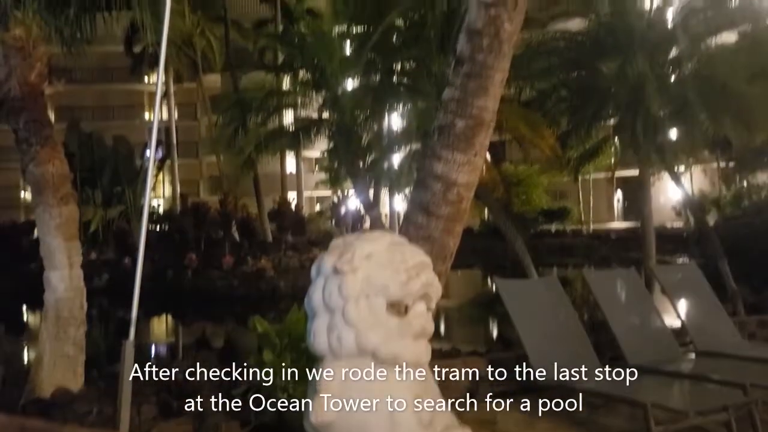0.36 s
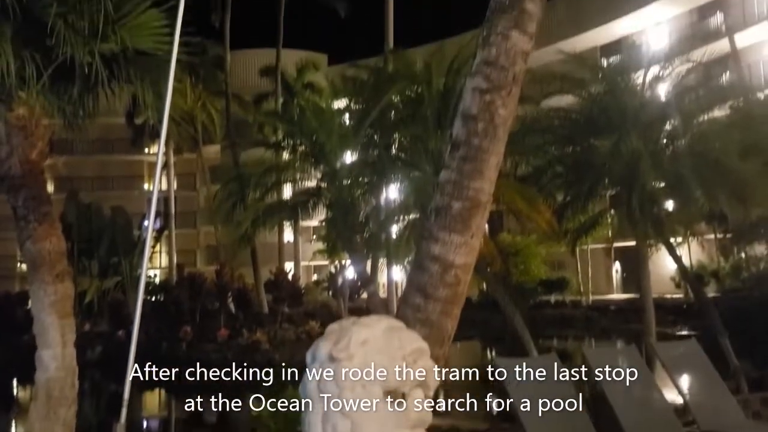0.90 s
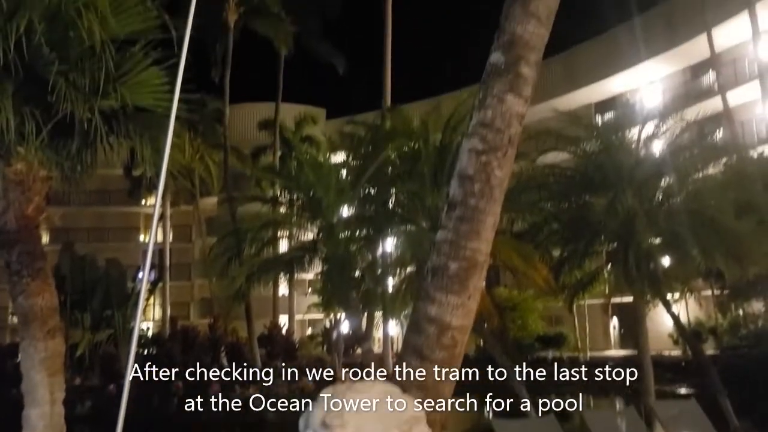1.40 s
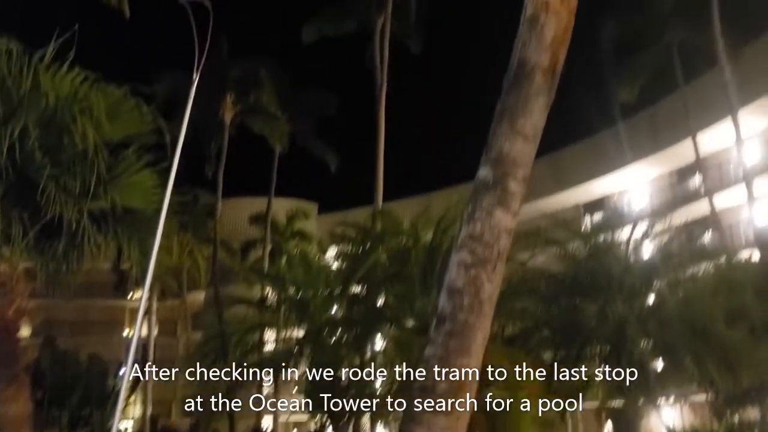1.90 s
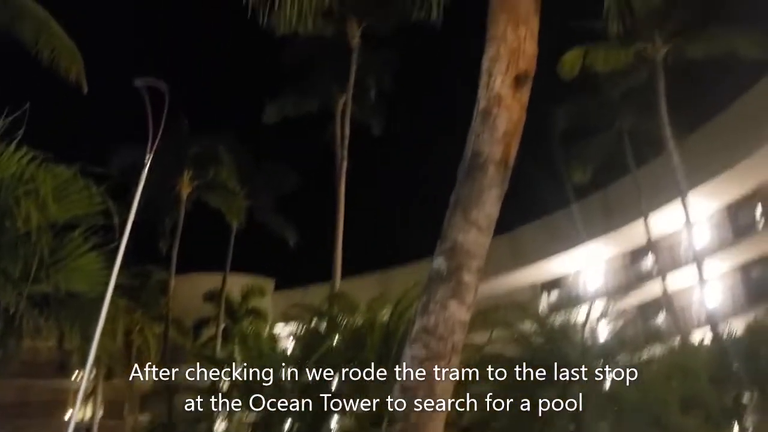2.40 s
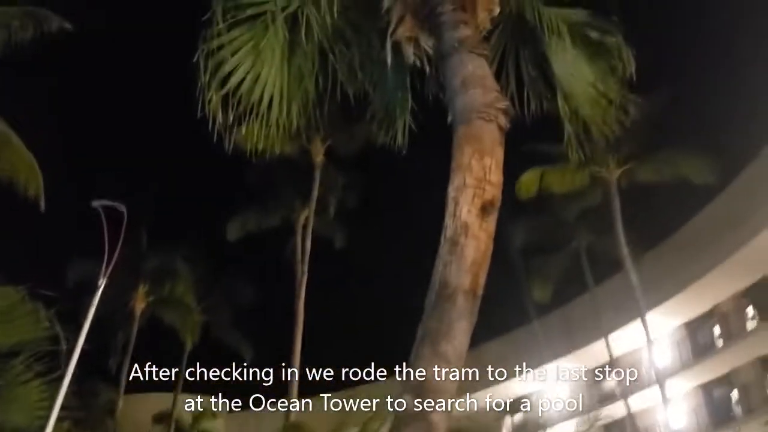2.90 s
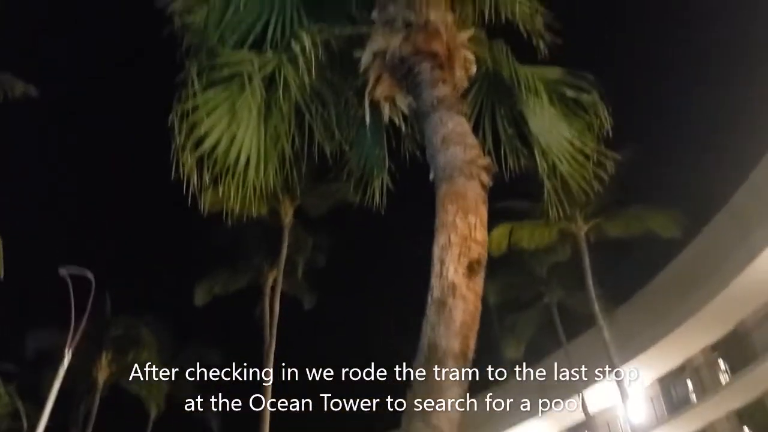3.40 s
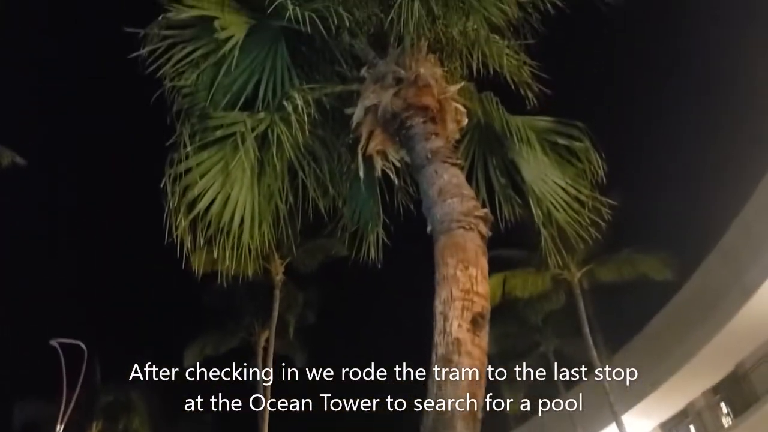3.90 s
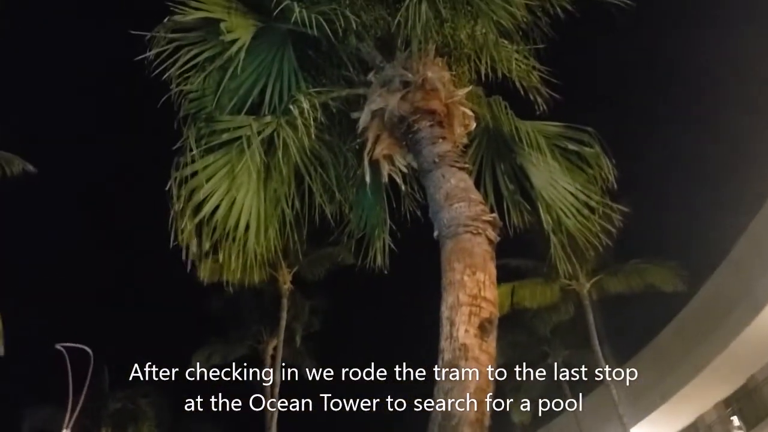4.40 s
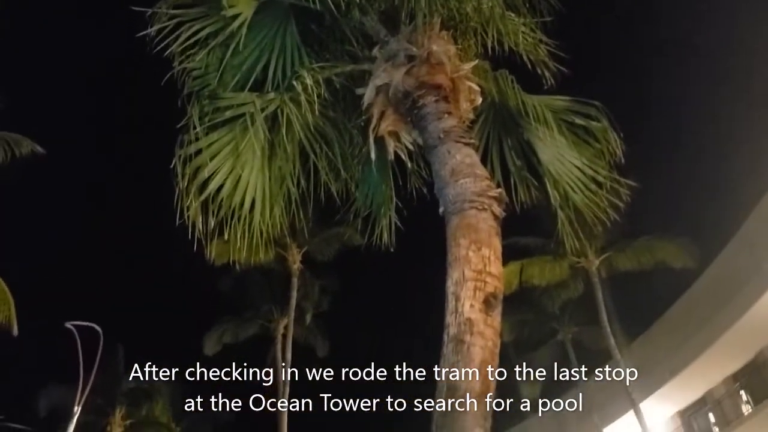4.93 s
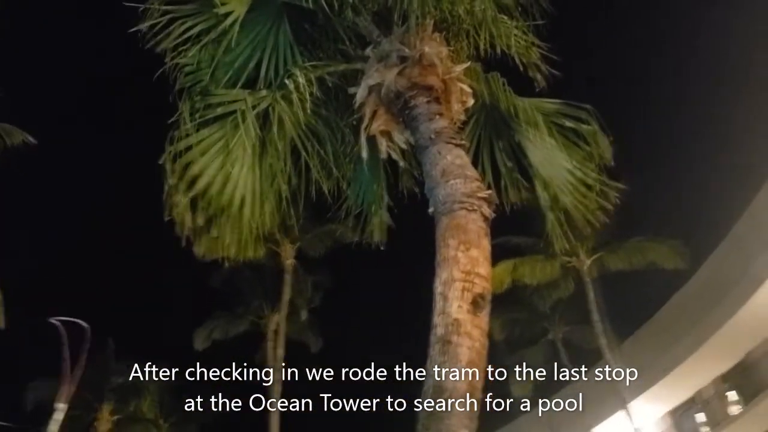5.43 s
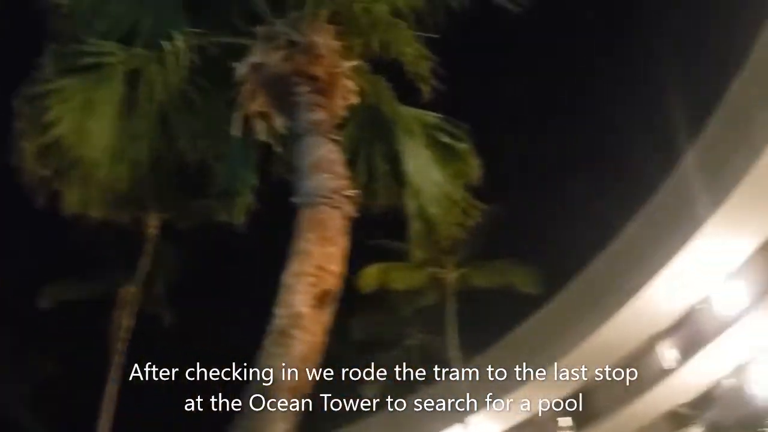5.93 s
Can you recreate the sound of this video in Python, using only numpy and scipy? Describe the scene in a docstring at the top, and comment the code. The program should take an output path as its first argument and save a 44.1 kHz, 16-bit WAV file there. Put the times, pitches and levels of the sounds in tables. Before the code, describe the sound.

Quiet nighttime hum and rustling with crackling snaps, then roosting birds call sparsely before bursting into loud, hoarse, echoing chatter.

```python
"""Birds roost in palm crowns at night: squeaks and whistles are bending syrinx tones, and the flock behind them
is hundreds of short hoarse calls that swell late on. Breathy bursts of throbbing noise surround the calls; grainy
hiss over a duller body is rustle early and the chorus's harsh treble late; snaps, cracks, thuds and knocks are
decaying noise. A ring of buildings smears the calls in a diffuse tail, and building machinery drones below as
shaped noise with narrow hums. It is heard on a phone with two unlike microphone ports."""
import sys
import numpy as np
from scipy import signal
from scipy.fft import rfft, irfft, next_fast_len
from scipy.io import wavfile
from scipy.ndimage import uniform_filter1d

SR = 44100
rng = np.random.default_rng(int(sys.argv[2]) if len(sys.argv) > 2 else 0)


def voltage_ratio(decibels):
    """Convert decibels (scalar or array-like) to amplitude ratios, 20 dB per decade."""
    exponent = np.asarray(decibels, float) / 20
    return 10 ** exponent


def file_out(sig):
    """Save sig as 16-bit WAV at sys.argv[1]."""
    # one column per channel
    cols = np.atleast_2d(sig).T
    # limit, then scale
    lim = np.clip(cols, -1, 1)
    pcm = np.round(lim * 32767).astype(np.int16)
    wavfile.write(sys.argv[1], SR, pcm)


N = 266805
t = np.arange(N) / SR
PORT_LAG = 24  # samples by which a sound fully to one side reaches the far port late
SHADOW_DB = 5  # the phone's body: such a sound is this much up at the near port, down at the far one


def curve(table, column):
    """One level column of a table over time, as gain."""
    rows = np.array(table)
    return voltage_ratio(np.interp(t, rows[:, 0], rows[:, column]))


def shape(x, hz, db):
    """Filter by dB points on a log-frequency axis."""
    length = x.shape[-1]
    size = next_fast_len(length + 4096)
    f = np.fft.rfftfreq(size, 1 / SR) + 1
    gain = voltage_ratio(np.interp(np.log(f), np.log(hz), db))
    return irfft(rfft(x, size) * gain, size)[..., :length]


def unit(x):
    """Scale to rms 1."""
    return x / np.sqrt(np.mean(x ** 2))


def noise(colour):
    """Two unrelated noises of one colour."""
    return unit(shape(rng.standard_normal((2, N)), *np.transpose(colour)))


def walk(rate):
    """Random levels held 1 / rate s and smoothed twice; spread near 1."""
    hold = int(SR / rate)
    steps = np.repeat(rng.standard_normal(N // hold + 1), hold)
    return 1.4 * uniform_filter1d(uniform_filter1d(steps, hold), hold)[:N]


def add(out, sound, s, side):
    """Place a sound (one row, or one per port); side -1 reaches the left port first and louder, +1 the right."""
    for channel, (away, row) in enumerate(zip((side, -side), sound * np.ones((2, 1)))):
        i = max(int(s * SR + (1 + away) * PORT_LAG / 2), 0)
        out[channel, i:i + len(row)] += voltage_ratio(-SHADOW_DB * away) * row[:max(N - i, 0)]


# level of the low drone, lower for the first second, before the trim in drone(): (t/s, level/dB)
DRONE_LEVEL = [(0.0, -46), (1.1, -47), (1.5, -41.5), (2.5, -42), (4.6, -40), (6.05, -42.5)]
# rumble spectrum, relative: (f/Hz, level/dB per Hz)
DRONE_COLOUR = [(12, -58), (20, -74), (46, -7.5), (75, -1), (156, -10), (180, -17), (229, -12), (352, -19),
                (387, -20), (440, -25.5), (476, -23.5), (687, -30), (900, -41), (1170, -48), (1980, -120)]
# machine hums: (f/Hz, bandwidth/Hz, level/dB against the rumble)
DRONE_HUMS = [(79.36, 1.75, -4.5), (119, 0.94, -3.5), (153.4, 9.3, -6.5)]


def drone():
    """Machinery far off: broad rumble with narrow noise-driven hums, nearly alike at both ports."""
    mid, side = noise(DRONE_COLOUR + [(2500, -68.0), (16000, -78)])
    for hz, width, hum_db in DRONE_HUMS:
        ring = signal.lfilter(*signal.iirpeak(hz, hz / width, SR), rng.standard_normal(N))
        mid = mid + voltage_ratio(hum_db) * unit(ring)
    side = shape(side, [60, 150, 300, 600], [-16.0, -7.5, -9.0, 0.5])
    stereo = mid + side * np.array([[1], [-1]])
    waver = voltage_ratio(0.6 * walk(3.5))
    return voltage_ratio(-2.5) * curve(DRONE_LEVEL, 1) * waver * stereo


# wall echoes, before the yard's overall gain: (delay t/s, level/dB against the diffuse tail)
WALL_ECHOES = [(0.057, -15), (0.149, -14), (0.184, -18), (0.302, -20)]


def yard(x):
    """Curved house fronts: a few clumped echoes in a long diffuse tail, other paths to each port."""
    t60_s, yard_db = 0.66, 2
    time = t[:int(1.6 * SR)]
    tail = np.exp(-np.log(1000) * time / t60_s) * np.clip(time / 0.0068, 0, 1)
    tail = tail / np.sqrt(np.sum(tail ** 2))
    for delay, echo_db in WALL_ECHOES:
        clump = np.exp(-.5 * ((time - delay) / 0.0017) ** 2)
        tail = tail + voltage_ratio(echo_db) * clump / np.sqrt(np.sum(clump ** 2))
    response = shape(rng.standard_normal((2, len(time))), [1000, 6000, 16000], [0, -1, -5]) * tail
    mono = x.mean(axis=0, keepdims=True)
    return voltage_ratio(yard_db) * signal.fftconvolve(mono, response, axes=1)[:, :N]


# rustle early, harsh treble of the bird chorus late, before the trims in grainy_hiss():
# (t/s, hiss level/dB, duller body level/dB)
HISS_LEVELS = [(0.0, -65.5, -59.5), (1.31, -72, -59.5), (1.6, -65, -48), (1.82, -52, -48),
               (2.12, -73, -38.5), (2.3, -65, -42.5), (2.46, -49.5, -41), (2.57, -45.5, -38.5),
               (2.94, -49, -43.5), (3.04, -55, -48.5), (3.3, -55, -50.5), (4.27, -45.5, -52.5),
               (4.41, -40.5, -52.5), (4.8, -38, -40.5), (4.97, -34.5, -50.5), (5.34, -31, -42.5),
               (5.8, -35.5, -44.5), (6.05, -35, -51)]
# hiss balance: (t/s, left minus right level/dB)
HISS_PAN = [(0.0, -3), (1.3, -3), (2.5, -0.5), (3.8, -2.5), (4.5, -2.5), (6.05, -6)]
# hiss spectrum, relative: (f/Hz, level/dB per Hz)
HISS_COLOUR = [(1200, -17.5), (2500, 7.5), (5000, 4), (10000, -4.5), (16000, -7.5)]
# duller body spectrum, relative: (f/Hz, level/dB per Hz)
BODY_COLOUR = [(250, 0), (500, -6.5), (1200, -7), (2500, -8), (5000, -6.5)]


def grainy_hiss():
    """Hiss made grainy by dense tiny ticks, over a duller body: rustle early, the chorus's harsh treble late."""
    ticks_db = 2.0 * rng.exponential(size=N) * (rng.random(N) < .004)
    grain = voltage_ratio(ticks_db + 1.3 * walk(20))
    hiss, body = noise(HISS_COLOUR), noise(BODY_COLOUR)
    # the right port shares some of the left port's sound, a little later
    hiss[1] = 0.2 * np.roll(hiss[0], PORT_LAG) + 0.91 * hiss[1]
    body[1] = 0.44 * np.roll(body[0], PORT_LAG) + 0.9 * body[1]
    pan = np.sqrt(curve(HISS_PAN, 1))
    hiss = unit(hiss * uniform_filter1d(grain, size=40)) * [pan, 1 / pan]
    body = body * voltage_ratio(0.38 * walk(6.37))
    return voltage_ratio(9.5) * curve(HISS_LEVELS, 1) * hiss + voltage_ratio(2.5) * curve(HISS_LEVELS, 2) * body


# snaps and cracks, with a few low thuds and knocks, before filter and port placing:
# (t/s, crack level/dB, swish level/dB, centre f/Hz)
SNAPS_AND_KNOCKS = [(.15, -44, -53, 9050), (0.191, -40, -53, 9000), (0.431, -60, -43, 4100),
                    (0.471, -49, -53, 2450), (0.819, -44, -52.5, 3640), (1.3, -33, -44.5, 6040),
                    (1.369, -43, -51.5, 1640), (1.505, -51, -40.5, 2500), (1.546, -31, -53, 1100),
                    (1.662, -32, -43, 6000), (1.749, -34, -48, 9000), (1.823, -23, -29, 6600),
                    (2.0, -33, -47, 1200), (2.043, -46, -41, 6000), (2.115, -11.5, -29, 8700),
                    (2.141, -26, -28.5, 450), (2.391, -28, -40.5, 1550), (2.72, -18, -30.5, 3950),
                    (2.789, -26, -45, 1400), (2.849, -42, -29, 477), (2.885, -36, -36, 520),
                    (2.94, -40, -36, 560), (2.857, -25, -34.5, 3160), (2.952, -29, -54, 1300)]


def snaps_and_knocks():
    """Noise decaying within a few milliseconds, each with a longer swish, on the left; the low ones thud and knock."""
    out = np.zeros((2, N))
    time = t[:8000]
    for s, db, swish_db, hz in SNAPS_AND_KNOCKS:
        fall = voltage_ratio(db) * np.exp(-time / .0022) + voltage_ratio(swish_db) * np.exp(-time / .06)
        fall = fall * np.clip(time / 0.0002, 0, 1)
        burst = rng.standard_normal(len(time)) * fall
        add(out, shape(burst, [hz / 5.0, hz, hz * 3.2], [-18, 0, -16]), s, -1)
    return out


# breathy treble bursts around the calls: (t/s, length/s, level/dB before the throb)
BREATH_BURSTS = [(2.355, 0.079, -39.5), (2.483, 0.058, -38), (3.205, 0.095, -42.5), (3.343, 0.083, -38),
                 (3.666, 0.022, -37.5), (3.707, 0.025, -34.5), (3.845, 0.083, -36.5), (4.238, 0.039, -37),
                 (4.38, 0.048, -53), (4.934, 0.088, -30), (5.095, 0.043, -27), (5.207, 0.079, -31),
                 (5.41, 0.077, -24.5), (5.815, 0.035, -34), (5.96, .08, -36)]


def breaths():
    """Short throbbing bursts of breathy treble noise around the birds' calls, each dying away."""
    throb_hz, depth, tail_s = 21.2, 0.32, 0.02
    gate = np.zeros(N)
    for s, length, db in BREATH_BURSTS:
        since = t - s
        throb = 1 + depth * np.cos(2 * np.pi * throb_hz * since)
        onset = np.clip(since / 0.0037, 0, 1)
        decay = np.exp(-np.clip(since - length, 0, None) / tail_s)
        gate = gate + voltage_ratio(db) * throb * onset * decay
    return gate * noise([(2000, -16.0), (5000, 6), (10000, 0.5), (16000, -9.5)])


def leaves(x, scatter_db):
    """Fronds around each perch scatter a call over a few milliseconds, differently for each port."""
    time = t[:900]
    sparse = rng.random((2, len(time))) < .05
    scatter = rng.standard_normal((2, len(time))) * np.exp(-time / .007) * sparse
    scatter = voltage_ratio(scatter_db) * scatter / np.sqrt(np.sum(scatter ** 2, axis=1, keepdims=True))
    scatter[:, 0] = 1  # the direct call
    return signal.fftconvolve(x[None], scatter, axes=1)


# syrinx partials 2 upward: (level/dB against the call's brightness)
OVERTONES_DB = [3, -2, -15]


def sing(rows, rough, throb_hz, hoarse, bright_db):
    """A syrinx tone along (t/s, f/Hz, level/dB) points: weak overtones, fast uneven throb, hoarsely shaking pitch."""
    s, hz, db = np.transpose(rows)
    time = np.arange(s[0], max(s[-1], s[0] + .004), 1 / SR)
    shake = np.interp(time - s[0], np.arange(200) / 500, rng.standard_normal(200))
    pitch = uniform_filter1d(np.interp(time, s, hz), size=130) * (1 + hoarse * shake)
    phase = 2 * np.pi * np.cumsum(pitch) / SR
    wave = np.sin(phase)
    for k, over_db in enumerate(OVERTONES_DB, 2):
        below_limit = k * pitch < SR * .45
        wave = wave + voltage_ratio(bright_db + over_db) * np.sin(k * phase) * below_limit
    beat = 2 * np.pi * throb_hz * (time - s[0])
    throb = 1 + rough * np.sin(beat + 2.7 * np.sin(0.299 * beat))
    envelope = voltage_ratio(np.interp(time, s, db)) * signal.windows.tukey(len(time), .25)
    return np.sqrt(2) * wave * throb * envelope


def chatter(count, pitch, octaves, bend, hoarse, side):
    """Many short hoarse calls around one side and one (t/s, f/Hz) pitch: rising, falling or arched, each its own size."""
    out = np.zeros((2, N))
    for k, draws in enumerate(rng.random((count, 8))):
        when, size, up, start_bend, end_bend, soft, speed, down = draws
        s = (k + when) / count * N / SR
        length = 0.00996 + 0.02504 * size ** 2
        top = np.interp(s, *np.transpose(pitch)) * 2 ** (octaves * (up - down))
        rows = [(0, top * (1 - bend * start_bend), -6),
                (length / 2, top, 0),
                (length, top * (1 - bend * end_bend), -5)]
        call = sing(rows, 0.8, 90 + 140 * speed, hoarse, bright_db=-20.5)
        # faster-throbbing calls sit further right
        add(out, voltage_ratio(-7 * soft) * leaves(call, scatter_db=-2.5), s, side + 0.54 * (speed - .5))
    return unit(out)


# the rest of the roost, before the trims in flock(): (t/s, low chatter level/dB, high squeaks level/dB)
FLOCK_LEVELS = [(0.0, -71, -63.5), (1.31, -93, -60), (1.8, -55, -52.5), (2.27, -43.5, -47),
                (2.45, -38, -33.5), (2.76, -50, -44), (2.96, -96, -59), (3.25, -44, -44),
                (3.39, -34.5, -36.5), (3.5, -58, -45.5), (3.75, -39.5, -38.5), (4.24, -44, -39.5),
                (4.41, -25, -31.5), (4.55, -34, -31.5), (4.9, -23, -39), (5.4, -25, -36.5),
                (5.75, -26.5, -34), (6.05, -27.5, -30.5)]
# centre pitch of the low chatter: (t/s, f/Hz)
FLOCK_PITCH = [(0.0, 3445), (2.4, 3670), (3.0, 3520), (3.3, 3768), (4.0, 4017), (4.3, 3442), (4.7, 3348),
               (4.9, 3590), (5.15, 3792), (5.4, 3307), (5.7, 3384), (6.05, 3390)]


def flock():
    """Crowds of syrinx calls: low chatter on the right and high squeaks on the left, each riding its own level."""
    low = chatter(count=900, pitch=FLOCK_PITCH, octaves=.65, bend=0.16, hoarse=0.015, side=.7)
    high = chatter(count=500, pitch=[(0, 6000)], octaves=.26, bend=.3, hoarse=0.0474, side=-.7)
    return voltage_ratio(-2.5) * curve(FLOCK_LEVELS, 1) * low + voltage_ratio(-5.0) * curve(FLOCK_LEVELS, 2) * high


def arch(s, length, start_hz, top_hz, end_hz, db):
    """A squeak: pitch glides to a thinner, rounded top and on along a weaker flank."""
    rise, fall = 0.28, 0.33  # shares of the call spent reaching the top and leaving it
    start_db, top_db, end_db = 1, -5.5, -7  # against the middle of the first flank
    share = np.array([0, rise / 2, rise, 1 - fall, 1 - fall / 2, 1])
    climb_hz, drop_hz = top_hz - (top_hz - start_hz) / 4, top_hz - (top_hz - end_hz) / 4
    hz = [start_hz, climb_hz, top_hz, top_hz, drop_hz, end_hz]
    level = db + np.array([start_db, 0, top_db, top_db, end_db, end_db])
    return np.transpose([s + length * share, hz, level])


# arched squeaks, before port placing: (t/s, length/s, start f/Hz, top f/Hz, end f/Hz, level/dB)
SQUEAK_CALLS = [(2.333, 0.05, 5800, 6660, 3050, -41.5), (3.207, 0.041, 3800, 6710, 3520, -35),
                (3.664, 0.052, 4190, 6670, 2950, -33.5), (3.848, 0.056, 5860, 6200, 3280, -38.5),
                (4.231, 0.045, 5000, 6600, 6500, -37), (4.734, 0.028, 5000, 6560, 6600, -33.5),
                (3.346, 0.035, 5700, 6220, 6050, -43), (4.997, 0.052, 5630, 6080, 5800, -33.5),
                (5.409, 0.051, 5760, 5800, 5600, -35.5)]


def squeaking_bird():
    """A bird up to the left: hoarse, rough syrinx arches, strongly scattered by its leaves."""
    out = np.zeros((2, N))
    for call in SQUEAK_CALLS:
        song = sing(arch(*call), .65, 240., hoarse=.018, bright_db=-24)
        add(out, leaves(song, scatter_db=0), call[0], -1)
    return out


def glide(s, length, start_hz, middle_hz, end_hz, db):
    """A whistle or tonal knock: pitch bends through its middle, level swells and fades."""
    return [(s, start_hz, db - 2), (s + length / 2, middle_hz, db), (s + length, end_hz, db - 3)]


# whistled notes, and a few very short tonal knocks, before port placing:
# (t/s, length/s, start f/Hz, middle f/Hz, end f/Hz, level/dB)
WHISTLES_AND_KNOCKS = [(0.064, 0.069, 2470, 2420, 2290, -65), (0.244, 0.031, 3460, 3450, 3510, -61),
                       (0.353, 0.21, 2600, 2610, 2620, -72), (0.584, 0.063, 1660, 1750, 1730, -71),
                       (1.01, 0.014, 5450, 5570, 5500, -63), (1.728, 0.013, 4020, 3940, 3950, -49),
                       (1.511, 0.0074, 1750, 1720, 1700, -54), (1.808, 0.0099, 3600, 3600, 3550, -45),
                       (2.488, 0.105, 3220, 3230, 3240, -39.5), (2.625, 0.085, 3030, 3020, 3000, -42),
                       (2.366, 0.015, 4240, 3830, 3200, -43.5), (2.422, .014, 4000, 3850, 3800, -42),
                       (2.718, .014, 4000, 3800, 3500, -40), (2.714, 0.036, 3200, 3130, 3000, -44),
                       (2.744, 0.046, 3220, 3180, 3170, -42), (2.785, 0.12, 3080, 3070, 2970, -48),
                       (2.896, .05, 3040, 3050, 3070, -48), (3.274, .022, 2800, 2750, 2600, -48),
                       (3.296, 0.023, 3700, 3700, 3640, -53), (3.347, 0.15, 3100, 3080, 3060, -47),
                       (3.212, 0.044, 5100, 5160, 5050, -53), (3.48, 0.185, 3080, 3090, 3060, -47),
                       (3.416, 0.016, 2050, 2020, 2000, -49), (4.385, 0.018, 2000, 1950, 1940, -40),
                       (4.501, 0.0397, 5700, 5500, 5400, -32), (4.555, 0.027, 5780, 5750, 5740, -31),
                       (3.712, 0.014, 3650, 3750, 3720, -36.5), (3.763, 0.032, 2620, 2680, 2520, -41.5),
                       (3.838, 0.042, 2980, 3090, 3000, -40), (3.891, 0.088, 3080, 3040, 2990, -45.5),
                       (3.902, 0.051, 3980, 4050, 3940, -42), (4.006, 0.064, 3050, 3000, 3050, -50),
                       (4.135, 0.028, 2974, 2940, 3030, -36.5), (4.199, 0.054, 3000, 2990, 2950, -43),
                       (4.36, 0.078, 3150, 3120, 3096, -45), (4.438, 0.055, 3050, 2990, 2920, -33),
                       (4.498, 0.051, 3000, 2996, 2900, -30.5), (4.357, 0.065, 3300, 3337, 3300, -36),
                       (4.566, 0.065, 3750, 3620, 3700, -34), (4.628, 0.059, 3050, 2990, 3000, -40),
                       (4.66, 0.056, 3780, 3760, 3740, -44), (4.723, 0.045, 2980, 3030, 2910, -41),
                       (4.792, 0.02, 3340, 3330, 3400, -18), (4.818, 0.016, 3150, 3120, 3150, -22),
                       (4.902, 0.017, 4100, 4170, 4350, -25), (4.813, 0.016, 4800, 4560, 3840, -25.5),
                       (4.825, 0.023, 4300, 4670, 4560, -24.5), (4.846, 0.044, 2500, 2820, 3040, -27.5),
                       (4.845, 0.045, 2400, 2140, 2140, -33), (4.886, 0.04, 2140, 2134, 2150, -24),
                       (4.883, 0.025, 4100, 4170, 4300, -26), (4.956, 0.012, 4400, 4300, 4300, -21),
                       (4.968, 0.046, 2830, 2880, 2950, -30), (4.96, .03, 6200, 5900, 5640, -25),
                       (5.003, .02, 5850, 5950, 5960, -31), (5.021, 0.028, 2750, 2236, 1860, -25.5),
                       (5.047, 0.021, 3700, 3860, 3930, -18.5), (5.127, 0.037, 2620, 2634, 2660, -31),
                       (5.069, 0.01, 3800, 4070, 4160, -14), (5.077, 0.0116, 4300, 4640, 4750, -19),
                       (5.083, 0.021, 5250, 5280, 5150, -24), (5.096, 0.027, 3600, 4050, 4550, -22),
                       (5.197, 0.012, 4500, 4500, 4400, -22), (5.215, 0.035, 4250, 4200, 4200, -28),
                       (5.271, 0.04, 3600, 3990, 3860, -21), (5.404, 0.054, 5450, 5350, 5400, -30.5),
                       (5.43, .02, 3450, 3450, 3400, -26), (5.306, 0.081, 2780, 2282, 2134, -22),
                       (5.385, 0.041, 2220, 2200, 2190, -32), (5.3, 0.026, 3100, 2985, 2780, -19),
                       (5.328, 0.037, 2800, 2984, 3080, -19), (5.347, 0.047, 3220, 3160, 3130, -24.5),
                       (5.44, 0.018, 2950, 3020, 3080, -25), (5.249, 0.055, 2950, 2970, 2850, -24),
                       (5.39, 0.047, 3050, 3113, 3170, -27), (5.451, 0.053, 2880, 2873, 2880, -25.5),
                       (5.493, 0.02, 4000, 4460, 4700, -19), (5.498, 0.038, 4780, 4836, 5000, -18.5),
                       (5.535, 0.026, 4810, 4850, 4930, -22.5), (5.494, 0.078, 2300, 2340, 2320, -33),
                       (5.63, 0.067, 2850, 2780, 2880, -36), (5.69, 0.043, 4200, 4150, 4300, -32),
                       (5.663, 0.039, 2340, 2330, 2360, -33), (5.703, 0.025, 2560, 2530, 2580, -21.5),
                       (5.729, 0.072, 2692, 2755, 2730, -20.5), (5.788, 0.016, 2500, 2315, 2020, -21.5),
                       (5.801, 0.014, 3300, 3350, 3280, -21), (5.811, 0.018, 3950, 4070, 4200, -21),
                       (5.843, .014, 4100, 4000, 3900, -25), (5.858, .016, 3300, 3090, 2950, -24.5),
                       (5.867, 0.02, 2500, 2210, 1940, -25), (5.944, 0.018, 3350, 3380, 3320, -23.5),
                       (6.024, 0.027, 4720, 4660, 4600, -30.5), (5.967, 0.021, 3200, 3450, 3650, -13.5),
                       (5.995, 0.02, 3900, 3430, 3260, -13), (6.003, 0.036, 2610, 2660, 2750, -33)]


def whistles_and_tonal_knocks():
    """Gliding tones, a few as short as knocks: distant and purer on the left, then nearer and rougher on the right."""
    near_from_s = 4.4
    out = np.zeros((2, N))
    for call in WHISTLES_AND_KNOCKS:
        far = call[0] < near_from_s
        rough, hoarse, side = (.25, .0015, -1) if far else (.5, .005, .72)
        song = sing(glide(*call), rough, 165., hoarse, bright_db=-25)
        add(out, leaves(song, scatter_db=-11), call[0], side)
    return out


def scene():
    """Calls and cracks ring in the yard; hiss, breaths and drone stay dry."""
    squeaks, whistles = squeaking_bird(), whistles_and_tonal_knocks()
    crowd, cracks = flock(), snaps_and_knocks()
    # whistles and cracks are sent more weakly into the echo
    echo = yard(squeaks + crowd + voltage_ratio(-8) * whistles + voltage_ratio(-12.0) * cracks)
    return squeaks + whistles + cracks + crowd + echo + grainy_hiss() + breaths() + drone()


def roll_off(x):
    """The treble ends steeply here."""
    return signal.sosfilt(signal.butter(12, 16620, fs=SR, output="sos"), x)


# microphone port responses: (f/Hz, left level/dB, right level/dB)
PORT_RESPONSE = [(306, 1.5, 1), (1300, 9.5, 3.5), (2500, -0.5, -6), (4300, -1.5, 0), (5000, 3, -1.5),
                 (5800, 5.5, -6.5), (6600, -0.5, -13.5), (7150, -11.5, -10.5), (8540, -10.5, -11.5),
                 (9730, -0.5, -26), (11740, -6, -9.5), (16000, -16, -18.5)]


def record(dry):
    """Each port colours the sound with its own resonances and dips; the extreme top is cut."""
    hz, left_db, right_db = np.transpose(PORT_RESPONSE)
    heard = np.array([shape(dry[0], hz, left_db), shape(dry[1], hz, right_db)])
    mix = shape(heard, [15700, 15900], [0, -50])
    return roll_off(mix)


dry = scene()
out = record(dry)
file_out(out)
```